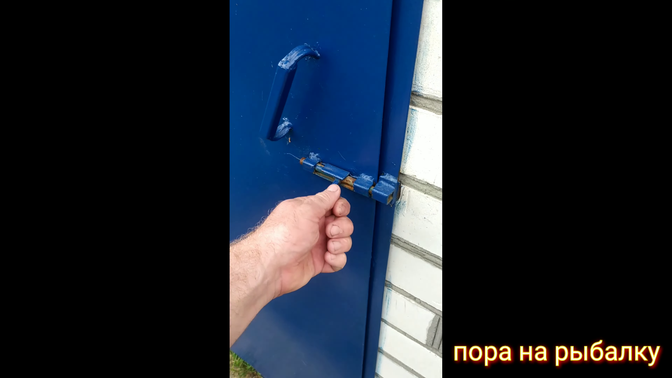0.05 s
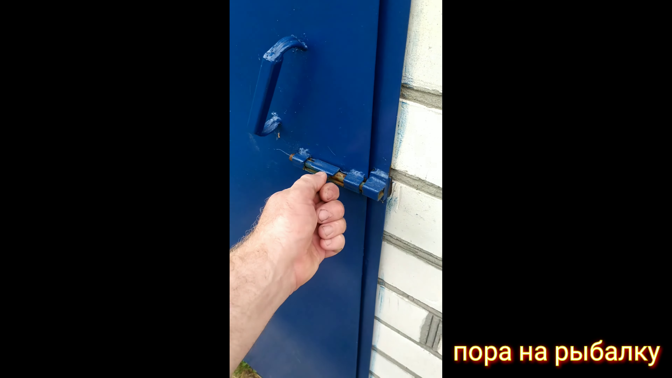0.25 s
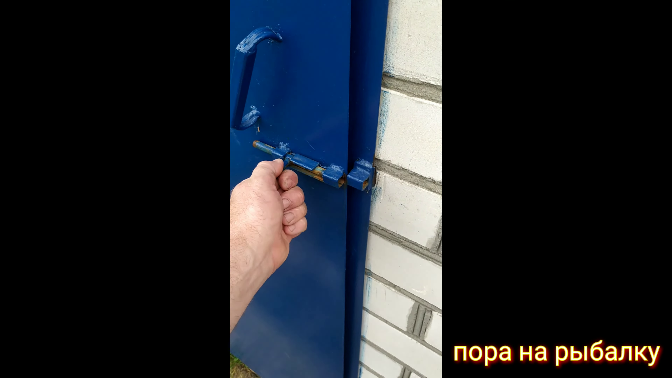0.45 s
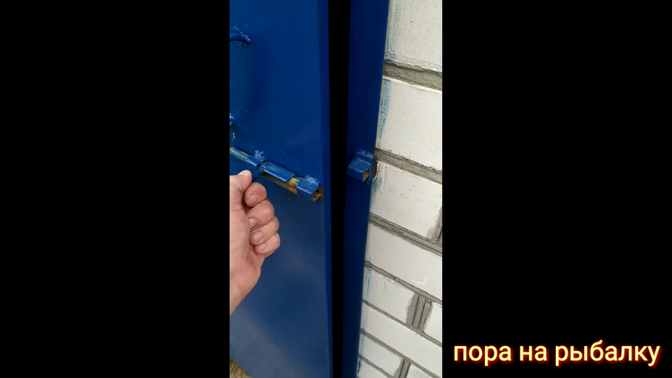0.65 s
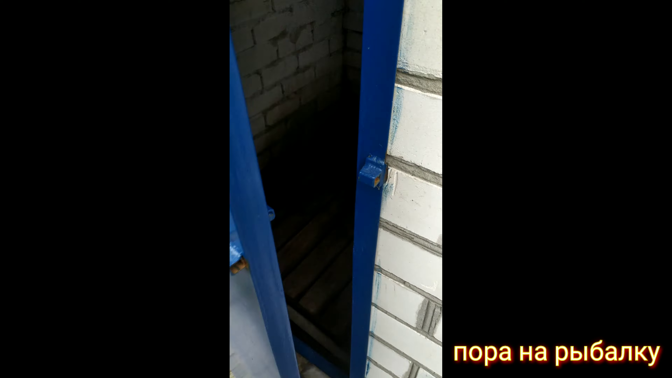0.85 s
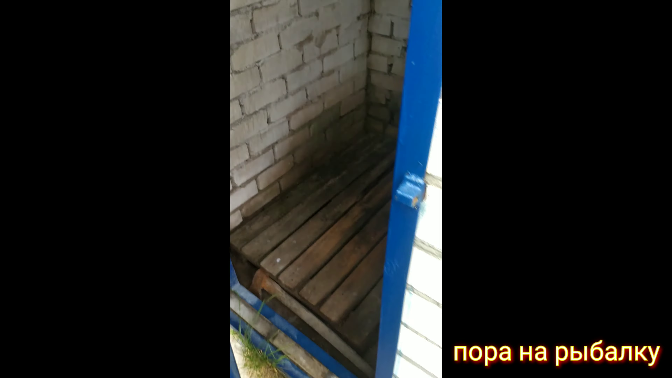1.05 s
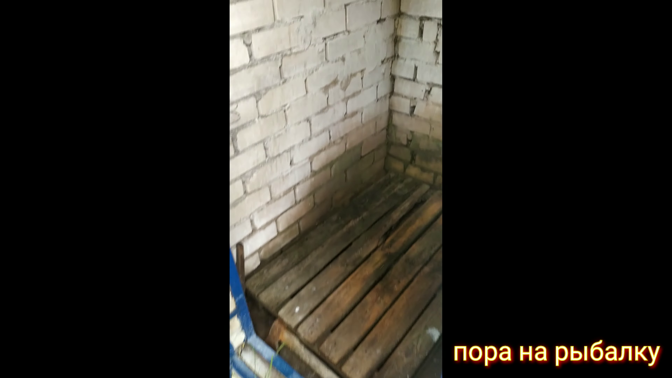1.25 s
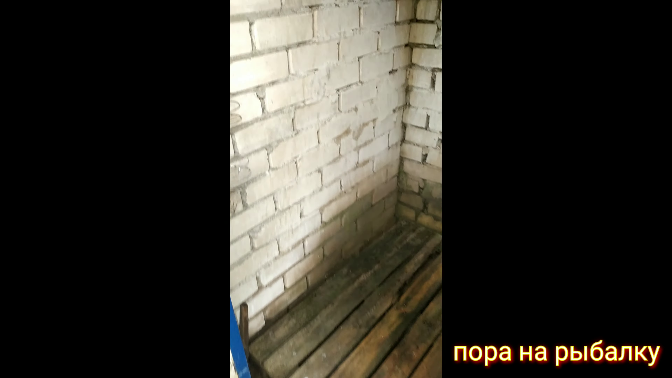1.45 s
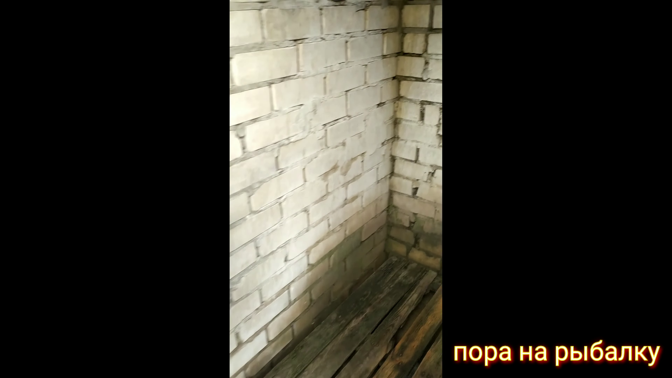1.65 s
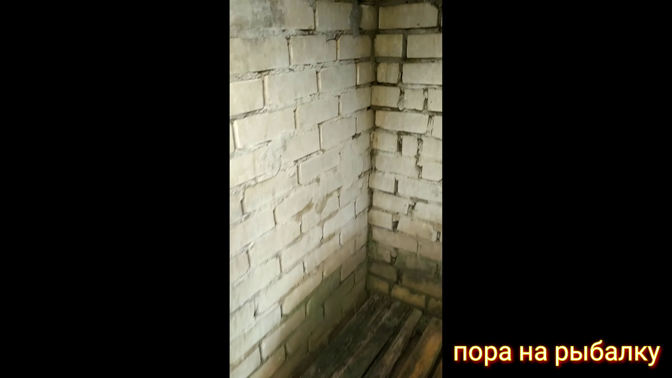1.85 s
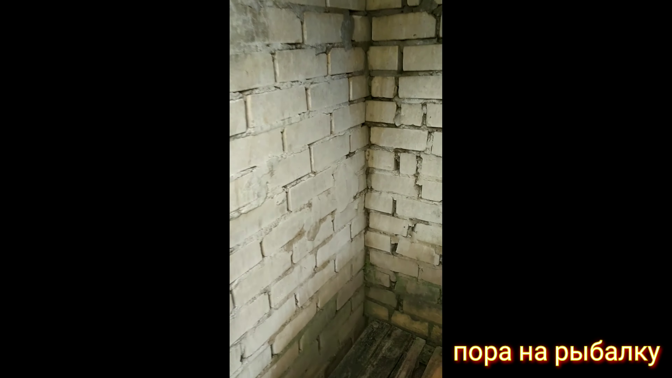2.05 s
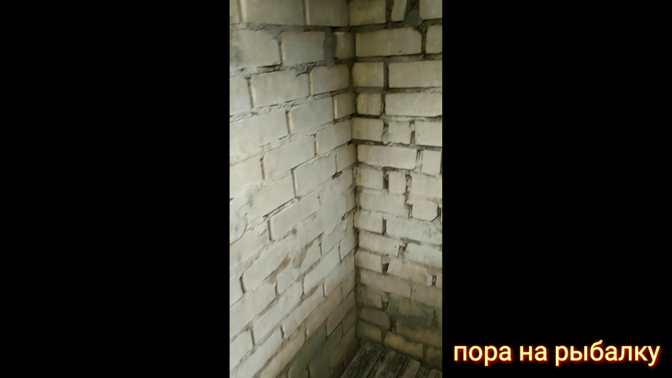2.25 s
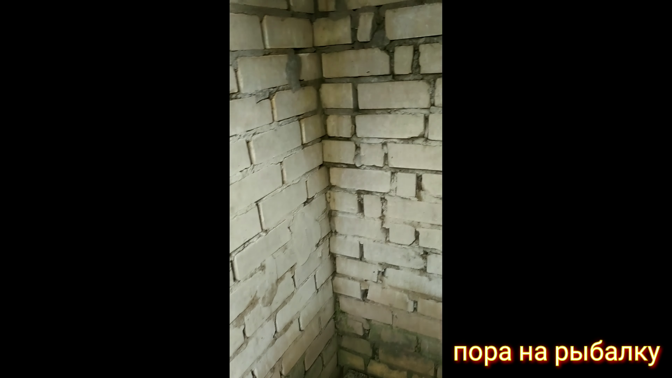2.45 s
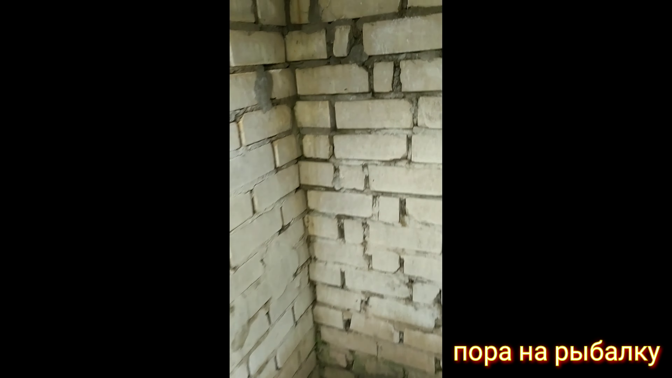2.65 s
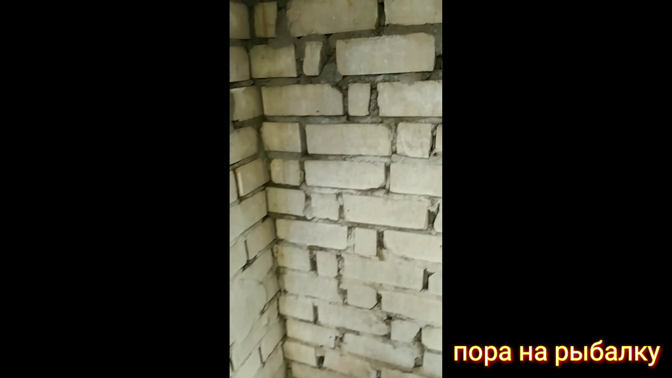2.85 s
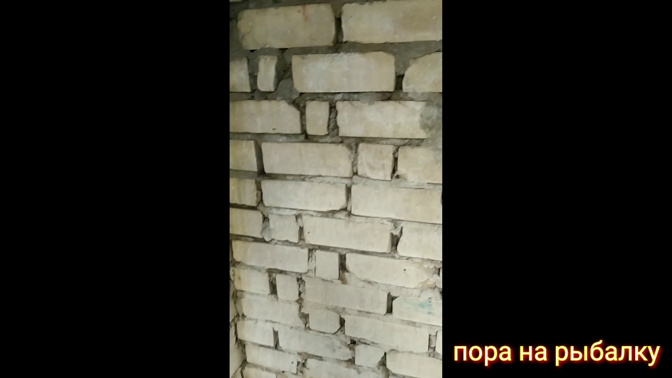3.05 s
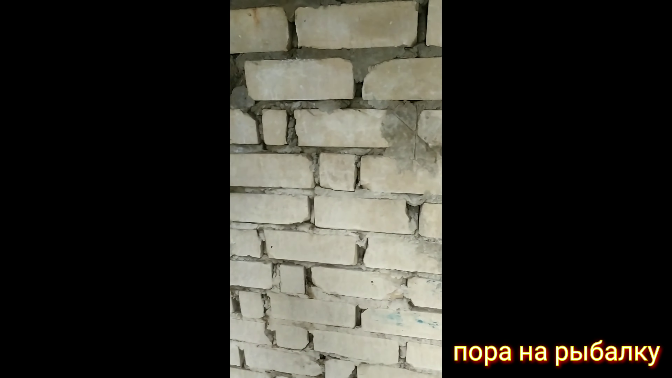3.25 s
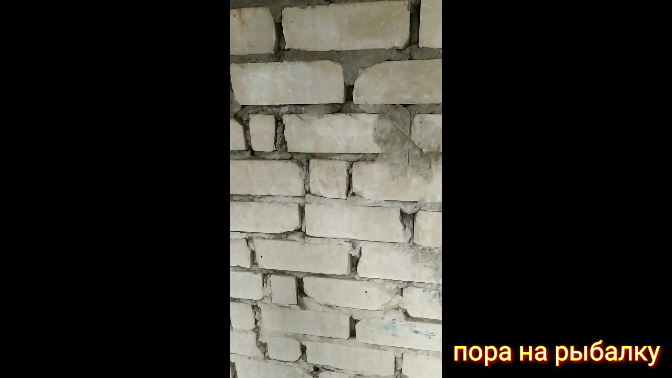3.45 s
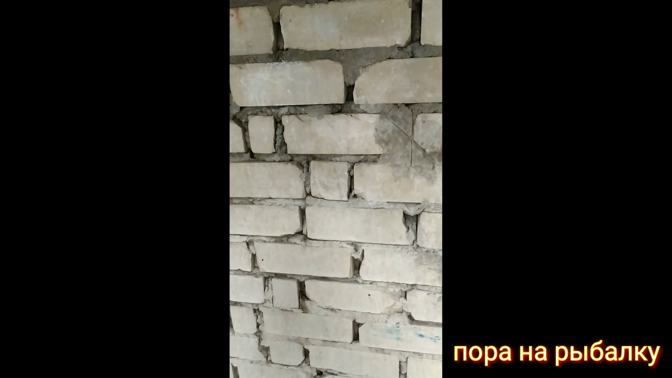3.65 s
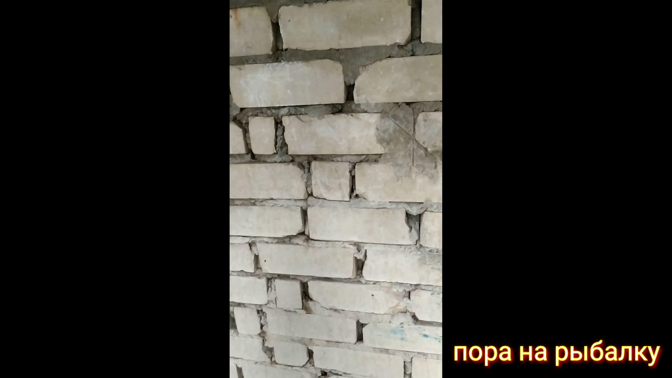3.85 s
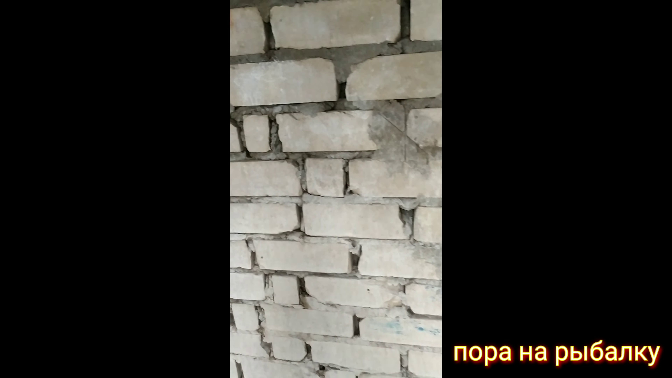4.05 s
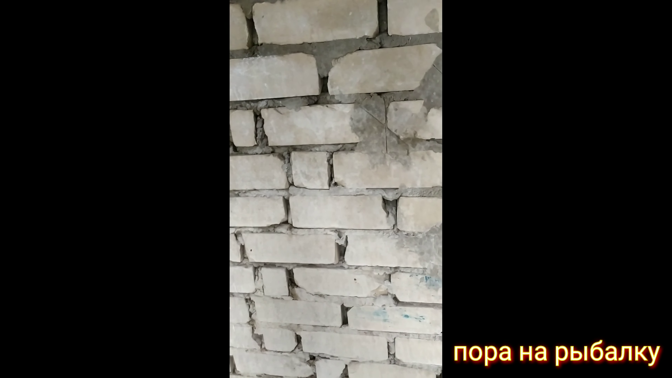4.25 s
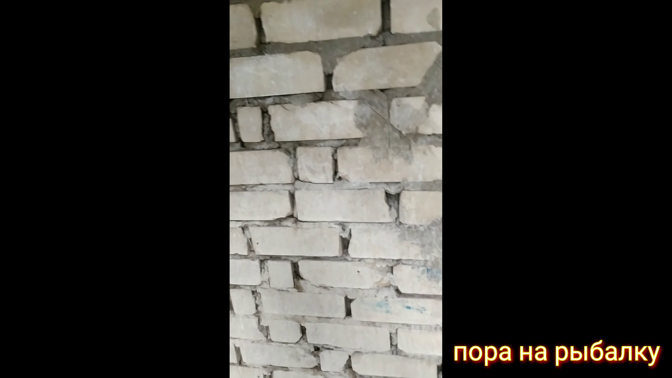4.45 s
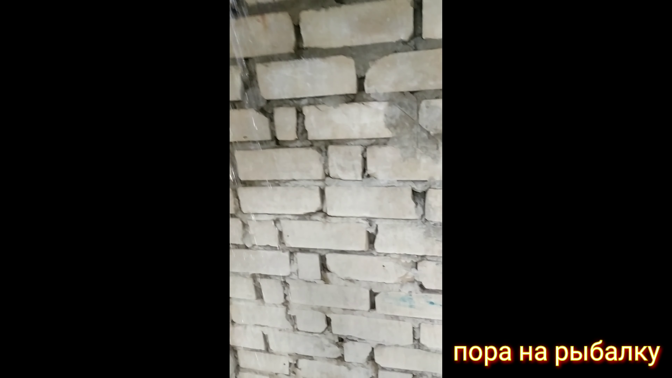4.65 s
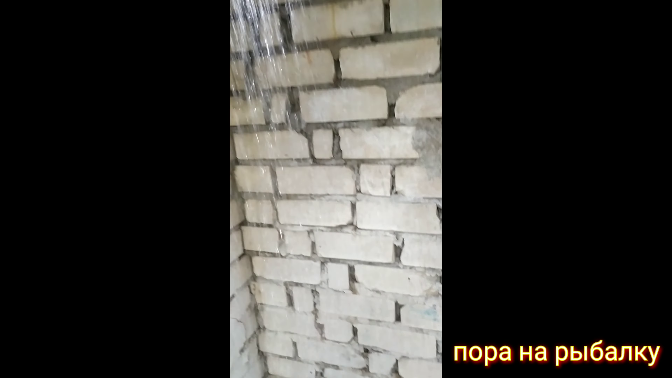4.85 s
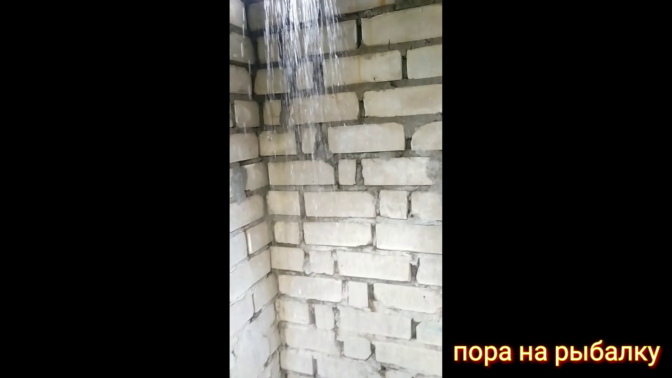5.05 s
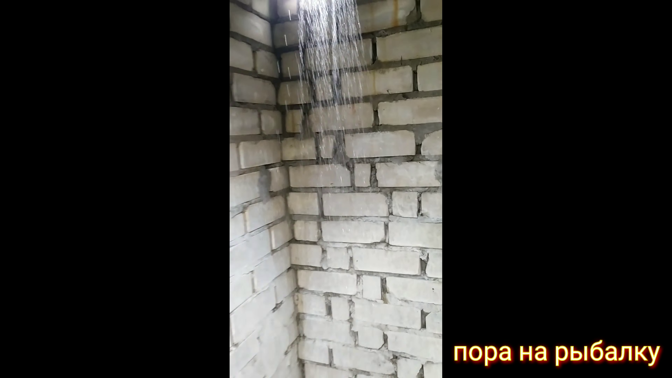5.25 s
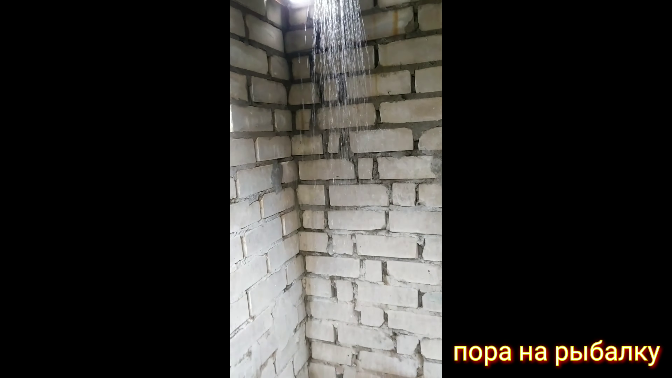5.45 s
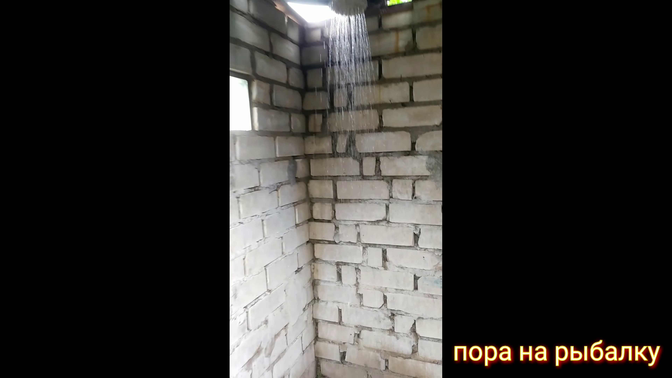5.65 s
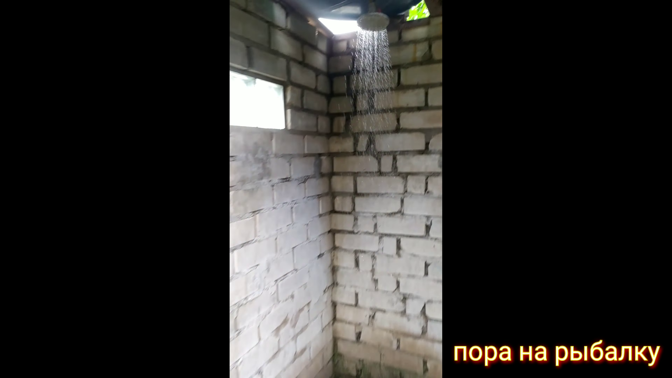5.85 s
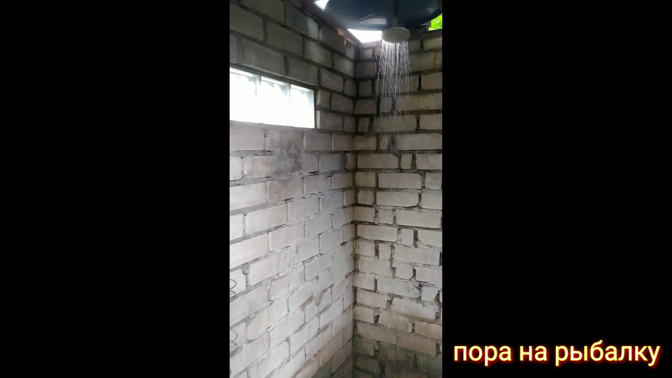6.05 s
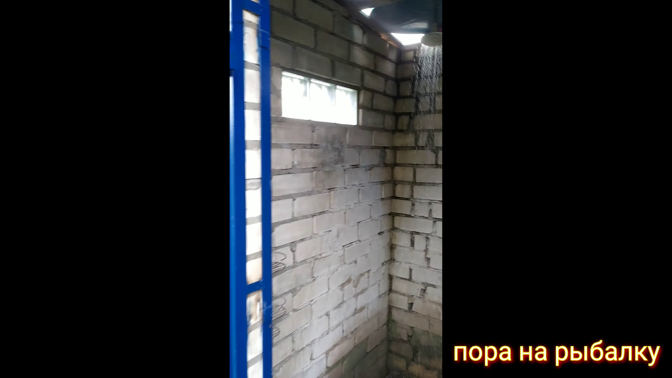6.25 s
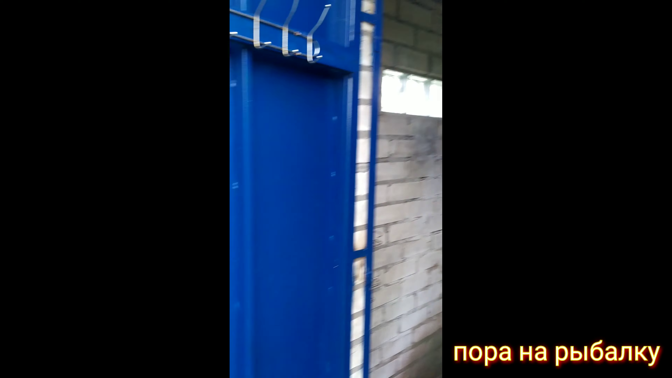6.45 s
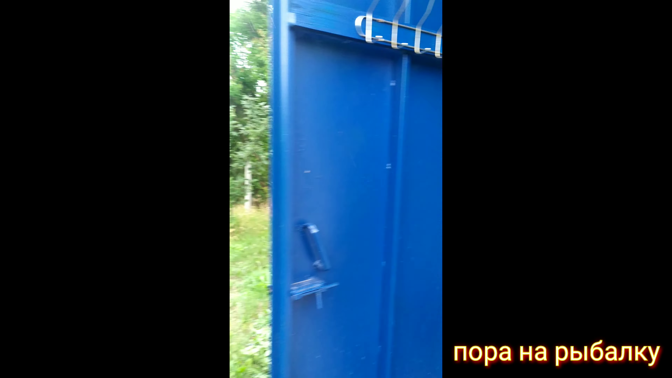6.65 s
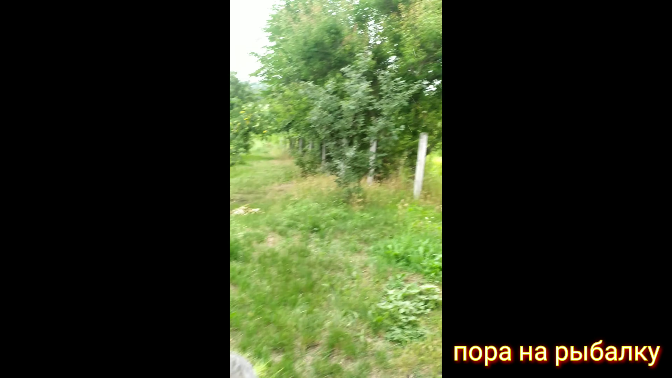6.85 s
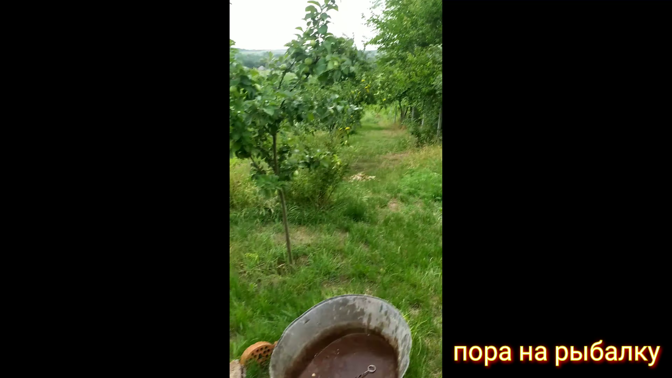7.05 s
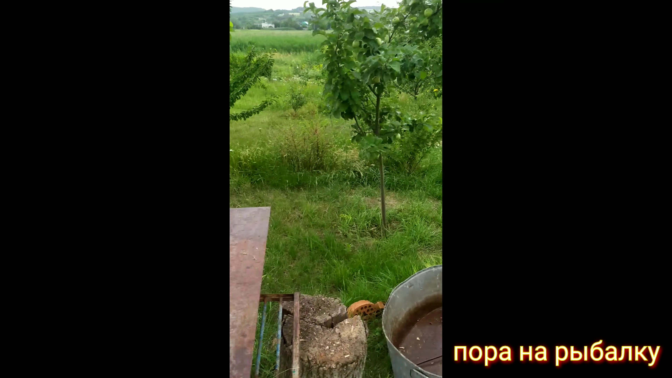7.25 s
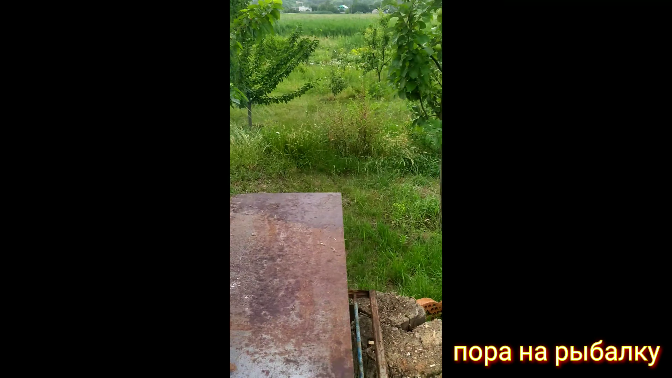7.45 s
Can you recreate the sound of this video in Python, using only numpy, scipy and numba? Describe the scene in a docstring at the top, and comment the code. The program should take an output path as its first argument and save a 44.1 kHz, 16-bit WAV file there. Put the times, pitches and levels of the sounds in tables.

```python
"""A shower sprays on the wet floor of a small brick hut: thousands of short ringing drops, with wall echoes.
Before it the bolt of a steel door is worked back and the hinges squeak: contact forces excite decaying modes.
Steps knock on duckboards by the same principle; soles and door edge rub by stick-slip; the shower head spits.
The listener backs out into the garden, where a far engine drones (a wavering tone over rumbling noise)
amid soft hiss and still air (coloured noise)."""
import sys
import numpy as np
from scipy import signal
from scipy.fft import rfft, irfft, next_fast_len
from scipy.io import wavfile
from scipy.ndimage import uniform_filter1d, map_coordinates
from numba import njit

SR = 44100
rng = np.random.default_rng(int(sys.argv[2]) if len(sys.argv) > 2 else 0)


def wav_out(sig):
    """Save sig, one row per channel (or a flat mono array), as 16-bit PCM at SR to the path in sys.argv[1]."""
    wavfile.write(sys.argv[1], SR, np.round(np.clip(np.atleast_2d(sig).T, -1, 1) * 32767).astype(np.int16))


N = 331191
TIME = np.arange(N) / SR

# Spectra of fine spray, big drops and water landing on the boards: frequency_hz, gain_db
SPRAY_SPECTRUM = [(1500, -26.5), (4000, -19.5), (5500, -11), (7000, -5), (8500, -1.5), (10000, -0.5),
                  (12000, -4), (14500, -9), (16000, -16)]
SPLATTER_SPECTRUM = [(1500, -60), (2400, -13), (3400, -11.5), (4500, -4.5), (6000, 1), (7500, 4),
                     (9000, -18), (12000, -36)]
PATTER_SPECTRUM = [(80, -36), (130, 1), (190, -5.5), (280, 2), (430, -3.5), (600, -2), (1000, -3),
                   (1600, -10), (2500, -10.5), (3500, -15.5), (5000, -13)]
# The shower as heard by the listener, who turns and backs out: time_s, level_db, left_minus_right_db
SHOWER_HEARD = [(4.6, -25, 3.5), (5.75, -26.5, 4), (6.45, -30.5, 7), (7.03, -37.5, 2), (7.5, -41, 1.5)]
# Big splashes, relative to the steady spray: start_s, length_s, fine_drops_db, big_drops_db
SPLASHES = [(4.595, 0.098, 0, -2.5), (4.99, 0.072, -21, -4), (5.305, 0.033, -1, -8),
            (5.387, 0.047, -2, -3.5), (5.69, 0.068, -6, -5.5), (6.222, .02, -3, -6),
            (6.41, 0.038, 3.5, -3.5), (6.746, 0.03, 2, -2.5), (6.89, 0.05, 4.5, -13),
            (7.15, 0.013, -1, -2.5)]
# Fat drops smacking on boards and bricks close by: start_s, level_db
SMACKS = [(4.606, -32), (4.741, -25), (4.823, -28), (5.0484, -31), (5.6875, -27), (5.735, -24.5),
          (5.759, -25.5), (5.866, -33), (5.925, -24.5), (5.992, -31), (6.224, -30.5), (6.2546, -28),
          (6.315, -32), (6.76, -33.5), (6.8915, -42), (7.125, -39.5)]
# Spectrum of a smack: frequency_hz, gain_db
SMACK_SPECTRUM = [(900, -40), (2500, -35), (4500, -4), (6500, -1.5), (9500, 12), (12000, 2), (15500, -41)]
# Single spits and drips: start_s, level_db
SPITS = [(3.3268, -35), (3.935, -27), (4.0626, -18.5), (4.108, -20), (4.142, -21), (4.184, -19.5),
         (4.218, -20.5), (4.2696, -30), (4.291, -23), (4.337, -16.5), (4.505, -31.5), (4.562, -21),
         (4.578, -24)]
# Spectrum of a spit: frequency_hz, gain_db
SPIT_SPECTRUM = [(300, -13), (2500, -23.0), (5500, -12.0), (8000, 6.0), (11000, -4.5), (15500, -27.0)]
# Spurts of the shower head while air leaves the pipe: start_s, length_s, level_db
SPURTS = [(4.062, 0.054, -37), (4.14, 0.048, -34), (4.19, 0.082, -41.5), (4.29, 0.029, -35.5),
          (4.336, 0.041, -39.5), (4.505, 0.046, -56)]
# Spectrum of the sputtering crackle: frequency_hz, gain_db
SPUTTER_SPECTRUM = [(800, -24.5), (2200, -15), (3500, -19), (5500, -13), (7000, -7.5), (9000, -1),
                    (11000, -7.5), (12500, -19), (15500, -38)]

# Blows on the door: start_s, contact_s, leaf_clank_db, bolt_ring_db, panel_boom_db
DOOR_BLOWS = [(.073, 0.0057, -35, -36.5, -44.5), (.166, 0.0052, -31, -57, -32.5),
              (.182, 0.009, -37.5, -48, -32), (.357, 0.015, -37.5, -44, -52),
              (.371, 0.0083, -32, -37, -32.5), (.439, 0.0093, -31, -40, -50), (.447, 0.0039, -35, -28, -47),
              (.4545, 0.0074, -21.5, -14.5, -37.5), (.462, 0.012, -18, -12.5, -26),
              (.578, 0.0068, -33, -23, -40.5), (.921, 0.0025, -45, -68, -50),
              (1.169, 0.011, -33.5, -32, -59), (1.251, 0.0069, -36, -26.5, -52),
              (1.271, 0.013, -28.5, -28, -42.5), (1.347, 0.047, -31, -44, -40.5)]
# The bolt handle raps on the leaf; the door edge clacks past the frame: start_s, contact_s, level_db
HANDLE_RAPS = [(.077, 0.0058, -36), (.168, 0.01, -32), (.1815, 0.006, -27.5)]
EDGE_CLACKS = [(1.2515, .008, -30), (1.272, .014, -28)]
# Dense rings of leaf, bolt in its guides, panel, handle and door edge: frequency_hz, gain_db
LEAF_SPECTRUM = [(100, -11), (400, -11), (700, -1.5), (1100, -5.5), (2100, -0.5), (3500, -11),
                 (5000, -12.5), (8000, -13), (14000, -57)]
BOLT_SPECTRUM = [(1500, -29.5), (4000, -15), (5800, -11.5), (8000, -5), (9500, -10), (11000, -22),
                 (13000, -20), (15000, -47)]
PANEL_SPECTRUM = [(30, -18), (65, -7), (130, 1), (175, -5.5), (225, -1.5), (290, -10), (385, -1.5),
                  (600, -17.5), (900, -32.5)]
HANDLE_SPECTRUM = [(1200, -16), (2500, 5), (4000, 0), (9000, -28)]
EDGE_SPECTRUM = [(2400, -24), (4400, 5), (9000, -28)]
# Single modes of the door parts: frequency_hz, gain_db, t60_s
LEAF_MODES = [(780, 11, 0.21), (1637, -13.5, 0.22), (1869, -4.5, .24), (2090, -6, 0.26), (2310, -7, 0.3),
              (2574, -7.5, 0.23), (2930, -12.5, 0.24), (3002, -2, 0.11), (3540, -1.5, 0.19),
              (3772, 8.5, 0.17)]
BOLT_MODES = [(5029, -8, .16), (5920, -6, .15), (7084, -2, .15), (7488, 0, .15), (7843, 3, .13),
              (8058, 1, .13), (8250, 1, .12), (8521, -2, .12), (8680, -1, .1), (9184, 0, .11)]
PANEL_MODES = [(131.3, 0.5, 0.37), (138.3, -7.5, 1.54), (227.6, -8.5, 1.06), (377, -4, 0.45),
               (531.5, -8, 0.54), (685, -4.5, 0.13), (782, -9, .18)]
HANDLE_MODES = [(2380, 3, 0.063), (2750, -9, 0.04), (3470, -3, 0.052), (4110, -16, 0.06)]
# Hinge squeaks: start_s, length_s, start_pitch_hz, end_pitch_hz, level_db
SQUEAKS = [(1.169, 0.022, 1963, 1980, -31), (1.234, 0.041, 1960, 1890, -37),
           (1.252, .085, 12450, 12200, -39), (1.268, 0.075, 1606, 1540, -37),
           (1.37, 0.062, 11870, 11600, -30.5), (1.534, .05, 1380, 1450, -48.5)]
# The door edge rubs along its frame; soles shuffle on the boards: start_s, length_s, level_db
SCRAPES = [(1.236, 0.035, -37.5), (1.266, 0.061, -35.5), (1.338, 0.054, -38), (1.44, 0.064, -51.5)]
SHUFFLES = [(2.13, 0.066, -49), (2.2, 0.1, -56.5), (2.41, 0.086, -52), (3.35, 0.078, -57)]
# Resonances struck by the slips: frequency_hz, width_hz, gain_db
SCRAPE_RESONANCES = [(680, 230, -14), (1140, 92, 3), (1374, 55, -7.5), (1626, 51, 5), (1900, 68, -6),
                     (2450, 130, -1), (3300, 210, 3), (4250, 1000, 9)]
SHUFFLE_RESONANCES = [(455, 130, -3), (814, 600, 5.5), (1250, 78, -1.5), (2150, 960, 2)]

# Steps on the duckboards: start_s, contact_s, thud_db, slat_knock_db, grit_db
STEPS = [(1.926, 0.0079, -35.5, -60, -74), (1.947, 0.017, -45, -47.5, -47), (2.125, 0.16, -52, -44, -55),
         (2.669, 0.009, -61, -45, -48), (2.689, 0.0146, -46, -30, -28), (2.830, 0.009, -61, -56, -36.5)]
# Dense rings of slats and grit: frequency_hz, gain_db
SLAT_SPECTRUM = [(80, -7), (150, 9), (380, 5.5), (800, 0.5), (1500, -5), (3000, -10), (7000, -12),
                 (15000, -17)]
GRIT_SPECTRUM = [(600, -18), (1600, -6.5), (4000, -2.5), (7000, -3.5), (11000, -9.5), (15000, -34)]
# Modes of loose slats, and of boards flexing under a foot: frequency_hz, gain_db, t60_s
SLAT_MODES = [(232, -7, .33), (358, -7, .19), (953, -6, .15), (1540, -1, .07), (2340, -2, .08)]
THUD_MODES = [(105, -1, 0.09), (68, -11, 0.16)]
# Dry taps close by: start_s, level_db
TAPS = [(1.513, -39), (3.412, -61)]
# Spectrum of a tap: frequency_hz, gain_db
TAP_SPECTRUM = [(80, 4), (240, 13), (700, -10.5), (1100, -15), (1800, -3), (3800, -1), (6000, 1.5),
                (8500, -12), (14000, -39)]

# Far engine, screened off while the listener is between the walls: time_s, level_db
DRONE_LEVEL = [(0, -51), (1.6, -54), (2.2, -60), (5.6, -58), (5.9, -44.5), (7.0, -43), (7.5, -48)]
# Soft high hiss, strongest just inside the hut: time_s, level_db
HISS_LEVEL = [(0, -60.5), (1.0, -57.5), (1.5, -50), (2.4, -51), (2.7, -55.5), (3.3, -55), (3.7, -61),
              (7.5, -51)]
# Low room noise, which swells a little deep inside the hut: time_s, level_db
AIR_LEVEL = [(0, -57.5), (2.5, -55.5), (3.3, -52), (3.9, -56), (7.5, -60)]
# Spectra of engine rumble, hiss, and still air of hut and garden: frequency_hz, gain_db
RUMBLE_SPECTRUM = [(25, -18), (45, 6), (70, 1.5), (110, 9.5), (135, -4.5), (155, -0.5), (190, -16.5),
                   (280, -31), (500, -42)]
HISS_SPECTRUM = [(400, 5.5), (1500, -7.0), (4000, -4), (7000, 0.0), (10000, 2.0), (15500, -9.5)]
AIR_SPECTRUM = [(20, -17), (38, 8.5), (60, -5.5), (95, -0.5), (130, -21), (180, -14), (255, 2), (400, -12),
                (800, -12.5), (1600, -21), (4000, -25), (16000, -49)]

# The valve opens once and stays open; a first trickle reaches the boards just ahead of the spray
OPENS_S, OPENING_S, TRICKLE_LEAD_S = 4.548, 0.018, 0.042
SPLATTER_DB, PATTER_DB = -16, -45.5  # big drops against fine spray; level of water landing on the boards
SURGE_ATTACK_S, SURGE_RELEASE_S = 0.011, 0.013
# Small splashes at random moments: mean rate and length, level, half-range of level, share of big drops
SMALL_SPLASHES_PER_S, SMALL_SPLASH_S = 12, 0.0037
SMALL_SPLASH_DB, SMALL_SCATTER_DB, SMALL_SPLATTER_DB = -6.5, -0.5, -3
SMACK_S = 0.0043  # contact time
SLIPS_PER_S, SCRAPE_SAG = 850, 0.035  # mean stick-slip rate; share by which resonances fall during one rub
TAP_LAG_S = .003  # travel time of the bending wave at 1 kHz
RUMBLE_DB = -2  # against the engine's hum
HISS_LEFT_DB = 3
TOP_HZ = 15550


def shower():
    """Superposition of drops: fine jets hiss, big drops splatter, both surge, and the floor patters below."""
    opened = np.clip((TIME - OPENS_S) / OPENING_S, 0, 1)
    landing = np.clip((TIME - OPENS_S + TRICKLE_LEAD_S) / (TRICKLE_LEAD_S + OPENING_S), 0, 1)
    spray = drops(SPRAY_SPECTRUM, count=45000, cycles=14, scatter_db=2.1, wet_db=-1)
    splatter = drops(SPLATTER_SPECTRUM, count=5000, cycles=10, scatter_db=2.5, wet_db=-2)
    small = small_splashes()
    # powers add, so the gains are roots of summed powers
    fine_gain = np.sqrt(1 + surges(SPLASHES, axis=2) + small)
    big_power = undb(SPLATTER_DB) ** 2 + surges(SPLASHES, axis=3) + undb(SMALL_SPLATTER_DB) ** 2 * small
    spray = shimmer(spray, patchy_db=3.0, rate=70, count=40) * fine_gain
    splatter = shimmer(splatter, patchy_db=6.0, rate=35, count=70) * np.sqrt(big_power)
    patter = drops(PATTER_SPECTRUM, count=24000, cycles=10.6, scatter_db=1.5, wet_db=5.5) * undb(PATTER_DB)
    # the jets break up unevenly, so the whole spray flutters, slowly and fast
    flutter = undb(0.53 * walk(45) + 0.23 * walk(260))
    falling = panned(spray + splatter, curve(SHOWER_HEARD, axis=2)) * undb(curve(SHOWER_HEARD, axis=1))
    return opened * flutter * falling + landing * patter


def drops(points, count, cycles, scatter_db, wet_db):
    """Shot noise: drops of very unequal size from all sides, with the brick walls' reflections; rms 1."""
    when, pitch, life, size, place = rng.random((count, 5)).T
    sizes = undb(-scatter_db * np.log(np.maximum(size, .002)))
    sides = np.transpose([np.sin(place * np.pi / 2), np.cos(place * np.pi / 2)])
    # the weaker channel hears the drop up to 0.4 ms later
    arrivals = when[:, None] * N + (1 - sides) * .0004 * SR
    hz = points[0][0] + pitch * (points[-1][0] - points[0][0])
    direct = grains(arrivals.astype(np.int64), hz, cycles * (.5 + life), sizes[:, None] * sides)
    echoes = walls(direct, t60=0.26)
    return unit(unit(colour(direct, points)) + undb(wet_db) * unit(colour(echoes, points)))


@njit
def grains(starts, hz, cycles, sizes):
    """Damped oscillation: each drop rings a few cycles, rising in pitch; starts and sizes hold two channels."""
    out = np.zeros((2, N))
    for k in range(len(starts)):
        length = int(cycles[k] * SR / hz[k]) + 3
        phase = 0.
        for i in range(min(length, N - max(starts[k, 0], starts[k, 1]))):
            phase += 2 * np.pi * hz[k] * (1 + .1 * i / length) / SR
            v = np.sin(phase) * np.exp(-5. * i / length) / np.sqrt(length)
            out[0, starts[k, 0] + i] += sizes[k, 0] * v
            out[1, starts[k, 1] + i] += sizes[k, 1] * v
    return out


def walls(x, t60):
    """Diffuse reverberation: many echo paths off the bricks blend into noise that follows a decaying power."""
    fade = np.exp(-2 * np.log(1000) * np.arange(SR // 2) / SR / t60)
    power = signal.fftconvolve(np.mean(x ** 2, axis=0), fade / fade.sum())[:N]
    return np.sqrt(np.maximum(power, 0)) * unit(stereo_noise(N))


def shimmer(x, patchy_db, rate, count=24):
    """Time-varying spectrum: drop sizes keep changing, so each narrow band swells and fades by itself."""
    _, _, spectra = signal.stft(x, SR, nperseg=512)
    bins, frames = spectra.shape[1:]
    patches = rng.standard_normal((count + 1, 2000))
    bands = np.linspace(0, count, bins)
    moments = np.linspace(0, min(rate * N / SR, 1999), frames)
    where = np.meshgrid(bands, moments, indexing="ij")
    gain = undb(patchy_db * map_coordinates(patches, where, order=1))
    return unit(signal.istft(spectra * gain, SR)[1][:, :N])


def surges(rows, axis=2):
    """Power envelope of water surges (start_s, length_s, level_db): each rises fast, holds and dies away."""
    held = np.zeros(N)
    for row in rows:
        held[int(row[0] * SR):int((row[0] + row[1]) * SR)] += undb(row[axis]) ** 2
    keep = np.exp(-2 / (SURGE_RELEASE_S * SR))
    released = signal.lfilter([1 - keep], [1, -keep], held + 1e-18)
    return np.abs(uniform_filter1d(np.maximum(held, released), int(SURGE_ATTACK_S * SR) + 1))


def small_splashes():
    """Random point process: power of brief splashes of unequal size once the valve opens."""
    count = int(SMALL_SPLASHES_PER_S * (N / SR - OPENS_S))
    when, length, size = rng.random((200, 3))[:count].T
    starts = OPENS_S + when * (N / SR - OPENS_S)
    levels = SMALL_SPLASH_DB + SMALL_SCATTER_DB * (2 * size - 1)
    return surges(zip(starts, SMALL_SPLASH_S * (.5 + length), levels))


def smacks():
    """Impact excitation: fat drops burst with a wet crack that the bricks throw back as a dense ring."""
    splat = dense_ring(SMACK_SPECTRUM, t60_low=.13, t60_high=.13, crack_db=-4)
    hits = force([(start, SMACK_S, db) for start, db in SMACKS], axis=2)
    return panned(through(hits, splat), curve(SHOWER_HEARD, axis=2))


def sputter():
    """Two-phase flow: air and water share the pipe, giving sharp noise bursts over spurts of ringing drops."""
    pops = np.zeros((2, N))
    t = np.arange(SR // 50) / SR
    for start, db in SPITS:
        i = int(start * SR)
        pops[:, i:i + len(t)] += undb(db) * rng.standard_normal((2, len(t))) * np.exp(-t / .0016)
    pops = pops + undb(-4) * walls(pops, t60=.14)
    pops = colour(pops, SPIT_SPECTRUM)
    crackle = drops(SPUTTER_SPECTRUM, count=32000, cycles=9, scatter_db=2.7, wet_db=-1)
    return panned(pops + crackle * np.sqrt(surges(SPURTS)), left_db=1.5)


def door():
    """Modal excitation of steel: a clank of the leaf, a bright ring of the bolt and a long panel boom."""
    leaf = dense_ring(LEAF_SPECTRUM, t60_low=0.28, t60_high=0.17, crack_db=-12)
    leaf = leaf + undb(-8.5) * mode_ring(LEAF_MODES, np.pi)
    bolt = dense_ring(BOLT_SPECTRUM, t60_low=0.2, t60_high=0.11, crack_db=-2.5)
    bolt = bolt + undb(-4) * mode_ring(BOLT_MODES, np.pi)
    panel = dense_ring(PANEL_SPECTRUM, t60_low=0.87, t60_high=0.18, crack_db=-27.0)
    panel = panel + undb(-2.0) * mode_ring(PANEL_MODES, 0.37)
    handle = dense_ring(HANDLE_SPECTRUM, t60_low=0.11, t60_high=0.097)
    handle = handle + undb(-3.5) * mode_ring(HANDLE_MODES, 2.3)
    edge = dense_ring(EDGE_SPECTRUM, t60_low=.15, t60_high=.15)
    clank = panned(through(force(DOOR_BLOWS, axis=2), leaf), left_db=0.5)
    ring = panned(through(force(DOOR_BLOWS, axis=3), bolt), left_db=2.0)
    boom = through(force(DOOR_BLOWS, axis=4, rough=False), panel)
    raps = through(force(HANDLE_RAPS, axis=2), handle)
    clacks = through(force(EDGE_CLACKS, axis=2), edge)
    return clank + ring + boom + raps + clacks


def hinge():
    """Stick-slip of dry steel heard as a self-sustained oscillation: a thin, unsteady, gliding whistle."""
    out = np.zeros(N)
    waver = 1 + 0.0023 * walk(400)
    for start, length, from_hz, to_hz, db in SQUEAKS:
        age = np.clip((TIME - start) / length, 0, 1)
        hz = (from_hz + (to_hz - from_hz) * age) * waver
        swell = np.interp(age, [0, .15, .5, 1], [0, 1, .4, 0])
        out += undb(db) * swell * np.sin(2 * np.pi * np.cumsum(hz) / SR)
    return np.array([out, out])


def rubs(rows, resonances):
    """Uneven stick-slip: each slip strikes short resonances, which sink as the contact slides on."""
    out = np.zeros((2, N))
    t = np.arange(SR // 25) / SR
    for start, length, db in rows:
        gaps, sizes = rng.random((140, 2)).T
        turns = rng.uniform(-np.pi, np.pi, (len(resonances), 2, 1)) / 2  # phase in each channel
        ages = np.cumsum(.5 + gaps) / SLIPS_PER_S
        rub = np.zeros((2, SR // 2))
        for age, size in zip(ages[ages < length], sizes):
            sag = 1 + SCRAPE_SAG * (.5 - age / length)
            slip = 0
            for (hz, width, gain_db), turn in zip(resonances, turns):
                decay = np.sqrt(width) * np.exp(-np.pi * width * t)
                slip = slip + undb(gain_db) * decay * np.sin(2 * np.pi * hz * sag * t + turn)
            i = int(age * SR)
            rub[:, i:i + len(t)] += (.5 + size) * np.sqrt(np.sin(np.pi * age / length)) * slip
        i = int(start * SR)
        out[:, i:i + SR // 2] += undb(db) * np.sqrt(length * SR) * unit_energy(rub)
    return out


def steps():
    """Impact on coupled bodies: the duckboards thud, loose slats knock and grit scrapes under the sole."""
    slats = dense_ring(SLAT_SPECTRUM, t60_low=0.17, t60_high=0.27, crack_db=-6.5)
    slats = slats + undb(-5.0) * mode_ring(SLAT_MODES, 0.54)
    gritty = dense_ring(GRIT_SPECTRUM, t60_low=0.11, t60_high=0.18, crack_db=-4.0)
    thud = through(force(STEPS, axis=2, rough=False), mode_ring(THUD_MODES, 0))
    knock = through(force(STEPS, axis=3), slats)
    grit = through(force(STEPS, axis=4), gritty)
    return thud + panned(knock + grit, left_db=2.5)


def taps():
    """Dispersion of bending waves: the treble of a tick arrives first, its low knock behind, with a ring."""
    hz = np.fft.rfftfreq(SR, 1 / SR)
    # phase of a delay that falls as the root of frequency
    dispersed = irfft(np.exp(-4j * np.pi * TAP_LAG_S * np.sqrt(1000 * hz)), SR)
    tick = unit_energy(colour(dispersed, TAP_SPECTRUM))
    ring = dense_ring(TAP_SPECTRUM, t60_low=.16, t60_high=.14, crack_db=-30)
    hits = np.zeros(N)
    for start, db in TAPS:
        hits[int(start * SR)] = undb(db) * np.sqrt(SR / 50)
    return panned(through(hits, tick + undb(2) * ring), left_db=3.5)


def force(table, axis, rough=True):
    """Contact force: a run of tiny impacts, or a soft 1 ms push; levels refer to a fiftieth of a second."""
    out = np.zeros(N + SR)
    push = np.hanning(44) / np.hanning(44).sum()
    for row in table:
        size = max(int(row[1] * SR), 8)
        chance = rng.standard_normal(SR // 4)[:size]
        burst = unit_energy(chance * np.abs(chance) * np.linspace(1, .5, size)) if rough else push
        start = int(max(row[0], 0) * SR)
        out[start:start + len(burst)] += undb(row[axis]) * burst * np.sqrt(SR / 50)
    return out[:N]


def dense_ring(points, t60_low, t60_high, crack_db=0):
    """High modal density: a short crack, then noise that decays at separate rates below and above 2.6 kHz."""
    t = np.arange(SR) / SR
    noise = colour(stereo_noise(SR), points)
    low = signal.sosfilt(signal.butter(2, 2600, fs=SR, output="sos"), noise)
    high = signal.sosfilt(signal.butter(2, 2600, "high", fs=SR, output="sos"), noise)
    tail = low * np.exp(-np.log(1000) * t / t60_low) - high * np.exp(-np.log(1000) * t / t60_high)
    crack = colour(stereo_noise(SR) * np.exp(-t / .0008) * (t < .02), points) * (t < .02)
    return unit_energy(unit_energy(tail) + undb(crack_db) * unit_energy(crack))


def mode_ring(modes, spread):
    """Sum of damped modes; `spread` scales the random phase of each mode in each channel."""
    t = np.arange(SR) / SR
    ring = 0
    for hz, db, t60 in modes:
        phase = spread * rng.uniform(-1.48, 1, (2, 1))
        ring = ring + undb(db) * np.sin(2 * np.pi * hz * t + phase) * np.exp(-np.log(1000) * t / t60)
    return unit_energy(ring)


def through(x, response):
    """Linear system: convolve sound x with a stereo impulse response."""
    return signal.fftconvolve(np.atleast_2d(x), response, axes=1)[:, :N]


def surroundings():
    """Stationary background: a far engine's wavering tone with its rumble, a soft hiss, and still air."""
    firing_hz = 61.5 * (1 + 0.01794 * walk(7.8))
    hum = np.sqrt(2) * np.sin(2 * np.pi * np.cumsum(firing_hz) / SR) * undb(1.2 * walk(12))
    rumble = unit(colour(stereo_noise(N, apart_hz=132), RUMBLE_SPECTRUM))
    engine = undb(curve(DRONE_LEVEL)) * (hum + undb(RUMBLE_DB) * rumble)
    hiss = unit(colour(stereo_noise(N), HISS_SPECTRUM))
    hiss = panned(hiss, HISS_LEFT_DB) * undb(curve(HISS_LEVEL) + 0.76 * walk(14))
    air = unit(colour(stereo_noise(N, apart_hz=110), AIR_SPECTRUM))
    return engine + hiss + air * undb(curve(AIR_LEVEL) + walk(8.5))


def stereo_noise(size, apart_hz=560):
    """Spatial coherence: white noise alike in both channels in the bass, more independent in the treble."""
    mid, side = rng.standard_normal((2, size))
    side = signal.sosfilt(signal.butter(1, apart_hz, "high", fs=SR, output="sos"), side)
    return np.array([mid + side, mid - side])


def walk(rate):
    """Random modulation: levels held 1 / rate s and smoothed twice; rms 1."""
    k = int(SR / rate)
    held = np.repeat(rng.standard_normal(N // k + 1), k)
    return unit(uniform_filter1d(uniform_filter1d(held, k), k)[:N])


def colour(x, points):
    """Spectral shaping: filter by (frequency_hz, gain_db) points joined over log frequency."""
    size = next_fast_len(x.shape[-1])
    hz, db = np.transpose(points)
    gain = undb(np.interp(np.log(np.fft.rfftfreq(size, 1 / SR) + 1), np.log(hz), db))
    return irfft(rfft(x, size) * gain, size)[..., :x.shape[-1]]


def panned(x, left_db):
    """Level difference between channels: set the left gain left_db over the right."""
    return np.array([x[0] * undb(left_db / 2), x[1] * undb(-left_db / 2)])


def curve(table, axis=1):
    """Linear interpolation in time of one column of a table."""
    rows = np.array(table)
    return np.interp(TIME, rows[:, 0], rows[:, axis])


def undb(db):
    """Logarithmic level: decibels to amplitude gain."""
    return 10 ** (np.asarray(db) / 20)


def unit(x):
    """Power normalization: scale to rms 1."""
    return x / np.sqrt(np.mean(x ** 2))


def unit_energy(x):
    """Energy normalization: scale to energy 1 in each channel."""
    return x / np.sqrt(np.sum(x ** 2, axis=-1, keepdims=True))


def scene():
    """Superposition of door, steps and water in and around the hut."""
    rubbing = rubs(SCRAPES, SCRAPE_RESONANCES) + rubs(SHUFFLES, SHUFFLE_RESONANCES)
    contacts = door() + hinge() + rubbing + steps() + taps()
    water = sputter() + shower() + smacks()
    return contacts + water + surroundings()


def record(dry):
    """Amplitude and band limits: clip at full scale, then a steep low-pass cuts the top."""
    lowpass = signal.ellip(10, .2, 70, TOP_HZ, fs=SR, output="sos")
    return signal.sosfilt(lowpass, np.clip(dry, -1, 1))


dry = scene()
out = record(dry)
wav_out(out)
```